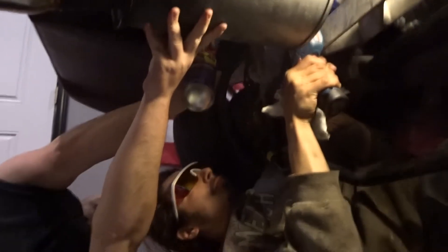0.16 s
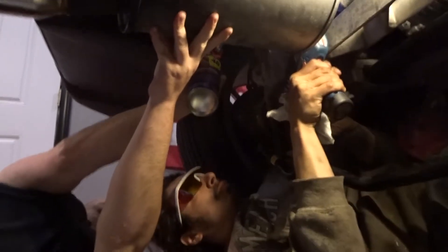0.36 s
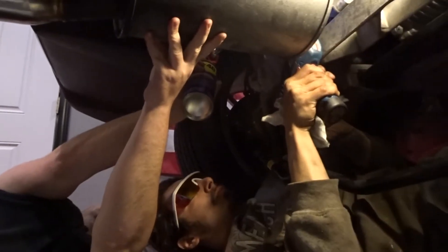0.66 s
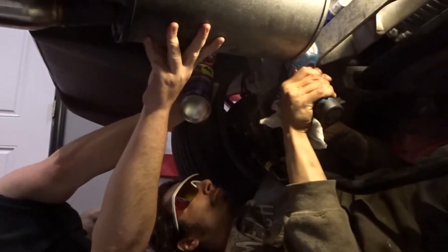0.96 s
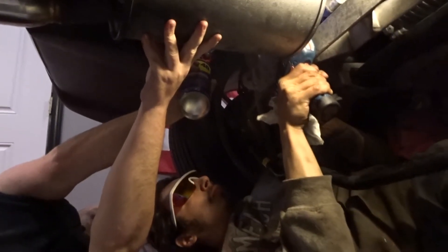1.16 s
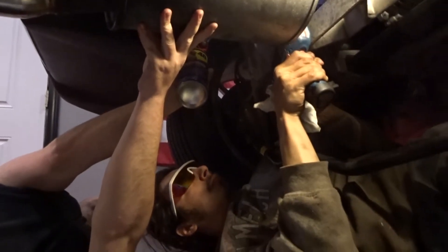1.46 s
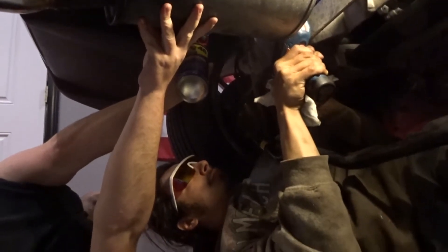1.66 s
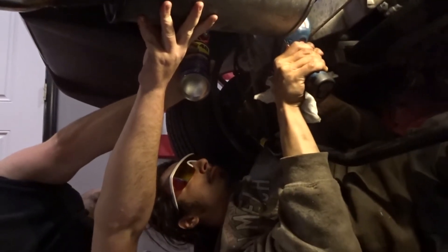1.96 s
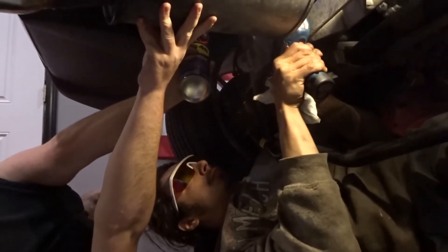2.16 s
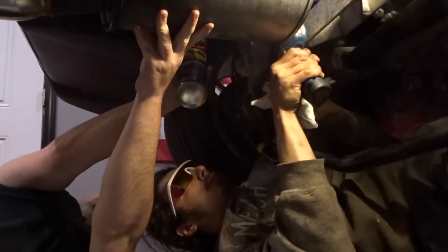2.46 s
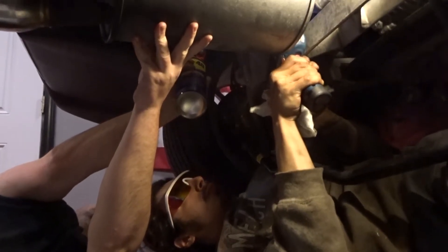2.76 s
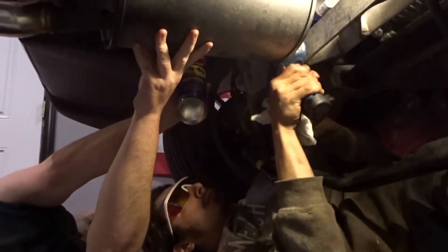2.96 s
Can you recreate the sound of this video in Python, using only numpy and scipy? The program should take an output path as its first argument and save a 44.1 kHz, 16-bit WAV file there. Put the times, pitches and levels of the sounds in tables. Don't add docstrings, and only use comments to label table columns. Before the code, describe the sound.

A cordless saw grinds harshly and steadily through a ringing steel exhaust pipe under a car.

```python
import sys
import numpy as np
from scipy import signal
from scipy.fft import rfft, irfft, next_fast_len
from scipy.io import wavfile
from scipy.ndimage import uniform_filter1d, map_coordinates

SR = 44100
rng = np.random.default_rng(int(sys.argv[2]) if len(sys.argv) > 2 else 0)


def transcribe(signal):
    frames = np.atleast_2d(signal).T
    limited = np.clip(frames, -1, 1)
    pcm = np.round(limited * 32767).astype(np.int16)
    wavfile.write(sys.argv[1], SR, pcm)


def field_ratio(decibels):
    return 10 ** (np.asarray(decibels, dtype=float) / 20)


N = 136710
t = np.arange(N) / SR

# t/s, stroke rate f/Hz, feed level/dB, lowest pipe ring level/dB,
# bite of the tooth tips level/dB
CUT_PROGRESS = [(0.0, 37.9, -11, -19, -5), (0.04, 37.67, -14.5, -13.5, -4.5), (0.32, 38.13, -15, -6, -2.5),
                (0.58, 37.84, -15, -8.5, -1), (0.83, 36.65, -16.5, -1.5, -3), (0.97, 36.98, -16, 2, -4.5),
                (1.2, 37.57, -15, -6, -4.5), (1.42, 36.83, -15, 0.5, -7), (1.5, 37.04, -16.5, -1.5, -4),
                (1.72, 38.08, -16.5, -10.5, -2), (2.0, 37.66, -15, -9, -2), (2.36, 38.64, -15, -13.5, -3),
                (2.45, 38.1, -15, -10, -6), (2.53, 38.53, -15.5, -23, -2.5), (2.6, 38.26, -15.5, -10, -2.5),
                (2.75, 35.3, -12, -6.5, -15), (2.87, 34.98, -14.5, -10.5, -10.5),
                (3.1, 36.06, -14.5, -4, -5.5)]
# f/Hz, width/Hz, level/dB
PIPE_MODES = [(916.7, 20.4, 0), (1101.5, 23.2, -5), (1342, 27, -10), (1495.6, 33.6, -7), (1736, 34, -11.5),
              (1957.4, 58, -3.5), (2315, 30, -5.5), (2529, 40, -7.5), (2712, 42, -13.5), (3126.6, 50, -2),
              (3773, 140, -21.5)]
# f/Hz, width/Hz, level/dB
WALL_MODES = [(4180, 200, -17), (4755, 173, 7), (5410, 214, 4), (5977, 92, 7), (6333, 270, -7.5),
              (6860, 82, -8), (7520, 43, 2.5), (8417, 28, 4), (8700, 39, -26), (9330, 72, -8.5),
              (9636, 59, 6), (10260, 59, -5), (10470, 57, -5.5), (12580, 140, -7.5)]
# f/Hz, level/dB
SHEET_COLOUR = [(24, -86), (40, -38), (789, -42), (917, 3.5), (1240, -14), (3130, -5), (3550, -11.5),
                (9920, -15), (16000, -27.5)]
# f/Hz, side minus middle level/dB
STEREO_WIDTH = [(60, -12), (110, -19), (200, -24), (380, -26), (700, -28.5), (1290, -14), (2380, -12),
                (4400, -5.5), (8120, -0.5), (15000, -1.5)]


def unit(x):
    return x / np.sqrt(np.mean(x ** 2))


def cut_curve(column):
    table = np.array(CUT_PROGRESS)
    return np.interp(t, table[:, 0], table[:, column])


def level_at(table, hz):
    table = np.array(table)
    return np.interp(np.log(hz + 1), np.log(table[:, 0]), table[:, 1])


def shaped(x, gain):
    length = x.shape[-1]
    size = next_fast_len(length + 4096)
    hz = np.arange(size // 2 + 1) * SR / size
    return irfft(rfft(x, size) * gain(hz), size)[..., :length]


def walk(rate_hz):
    knots = rng.standard_normal(64)
    drift = np.interp(t * rate_hz, np.arange(64), knots)
    return uniform_filter1d(drift, SR // 16) * 1.3


def grit(shape):
    grain_db = 2 * rng.standard_normal(shape)
    return rng.standard_normal(shape) * field_ratio(grain_db)


def scrape(turns):
    cells, memory = 1200, 0.842
    strokes = signal.lfilter([np.sqrt(1 - memory ** 2)], [1, -memory], grit((160, cells)), axis=0)
    slot = map_coordinates(strokes[20:].ravel(), [turns * cells])

    teeth_per_stroke, teeth_db, teeth_scatter_db = 14.3, -6.5, 2
    tooth = np.floor(teeth_per_stroke / 2 * np.cos(2 * np.pi * turns) + 0.3 * walk(2))
    tooth_size = field_ratio(teeth_scatter_db * rng.standard_normal(64))
    knocks = np.diff(tooth, prepend=tooth[0]) * tooth_size[tooth.astype(int) % 64]

    chips_db, chips_hz = -1.5, 3700
    chips = shaped(grit(N), lambda f: f / np.hypot(f, chips_hz))

    return_db, edge_turns, push_turns = -8, 0.045, 0.56
    phase = turns % 1
    rise = np.clip(phase / edge_turns, 0, 1)
    fall = np.clip((1 - phase) / (1 - push_turns), 0, 1)
    stroke_gain = field_ratio(return_db * (1 - rise * fall))
    contact = unit(slot) + field_ratio(teeth_db) * unit(knocks) + field_ratio(chips_db) * chips
    return unit(contact * stroke_gain)


def mode(x, hz, width_hz):
    r = np.exp(-np.pi * width_hz / SR)
    return unit(signal.lfilter([1, 0, -1], [1, -2 * r * np.cos(2 * np.pi * hz / SR), r * r], x))


def ringing(force, table):
    narrowing, swell_db, swell_hz = 0.61, 2.5, 3.026
    out = 0
    for hz, width_hz, db in table:
        level = field_ratio(db + swell_db * walk(swell_hz)) * np.sqrt(width_hz)
        ring = mode(force, hz, width_hz * narrowing) * level
        share = field_ratio(level_at(STEREO_WIDTH, hz)) * rng.choice([-1, 1])
        side = share * np.roll(ring, rng.integers(0, 40))
        out = out + np.array([ring + side, ring - side])
    return unit(out)


def diffuse(x, t60_s):
    seconds = np.arange(SR // 2) / SR
    fade = np.exp(-np.log(1000) * seconds / t60_s)
    mid, side = rng.standard_normal((2, len(seconds))) * fade
    side = shaped(side, lambda f: field_ratio(level_at(STEREO_WIDTH, f)))
    return unit(np.array([signal.fftconvolve(x, h)[:N] for h in (mid + side, mid - side)]))


def pipe(force):
    lowest = ringing(force, PIPE_MODES[:1]) * field_ratio(-2 + cut_curve(3))
    return lowest + ringing(force, PIPE_MODES[1:]) * field_ratio(-4)


def wall_and_sheet(force):
    wall = ringing(force, WALL_MODES) * field_ratio(-2.5)
    coloured = shaped(force, lambda f: field_ratio(level_at(SHEET_COLOUR, f)))
    return wall + diffuse(coloured, t60_s=0.08)


def tooth_bite(high):
    tips_hz, tips_db = 6800, 1
    tips = shaped(high, lambda f: 1 / np.sqrt(1 + (tips_hz / (f + 1)) ** 4))
    bite = cut_curve(4)
    return tips * (field_ratio(bite - bite.mean() + tips_db) - 1)


def hollow_under_car(steel):
    echoes = diffuse(steel.mean(axis=0), t60_s=0.17)
    return echoes * np.sqrt(np.mean(steel ** 2)) * field_ratio(-15)


def background_hum():
    noise = rng.standard_normal((2, N))
    return unit(shaped(noise, lambda f: 1 / (1 + (f / 400) ** 2) * f / (f + 200))) * field_ratio(-51)


def scene():
    turns = 0.3 + np.cumsum(cut_curve(1)) / SR
    force = scrape(turns)
    shear = scrape(turns + 0.25)
    low = pipe(shear)
    high = wall_and_sheet(force)
    steel = (low + high + tooth_bite(high)) * field_ratio(cut_curve(2))
    return steel + hollow_under_car(steel) + background_hum()


def low_pass(x):
    return signal.sosfilt(signal.butter(12, 16120, fs=SR, output="sos"), x)


def record(dry):
    thin = shaped(dry, lambda f: 1 / np.sqrt(1 + (700 / (f + 1)) ** 4))
    ceiling = 1.67
    mix = np.clip(ceiling * np.tanh(thin / ceiling), -1, 1)
    return low_pass(mix)


dry = scene()
out = record(dry)
transcribe(out)
```